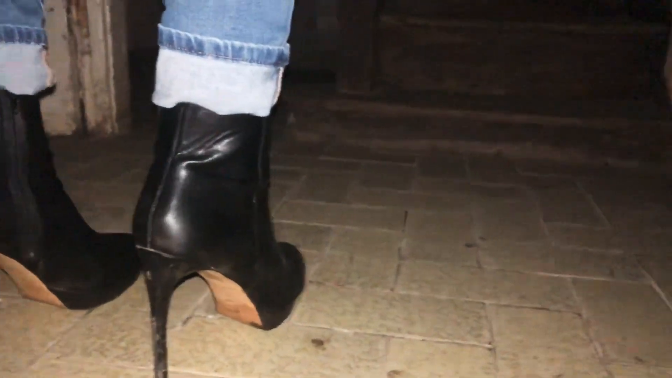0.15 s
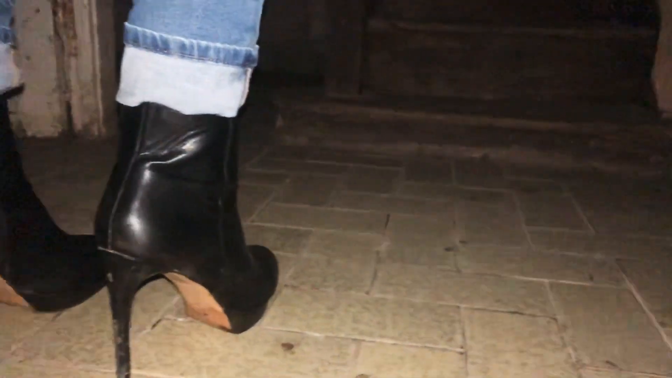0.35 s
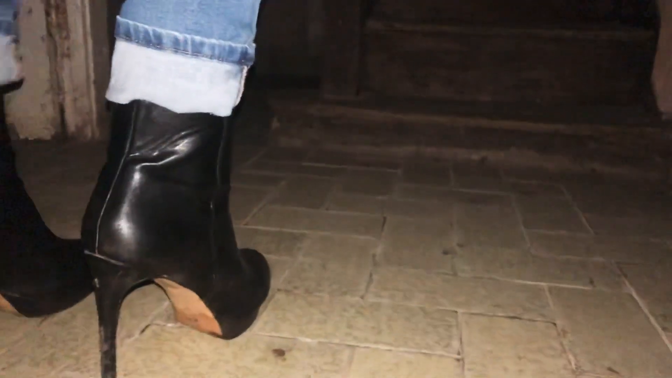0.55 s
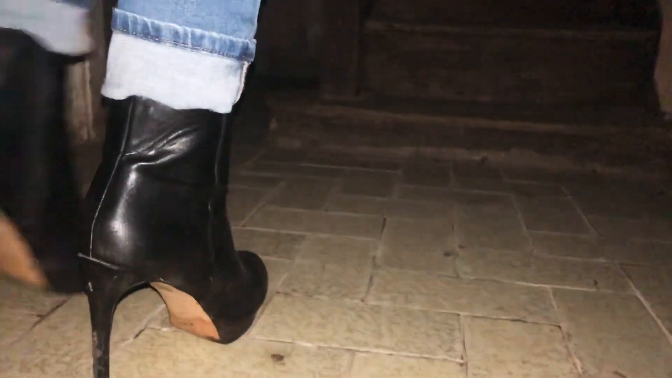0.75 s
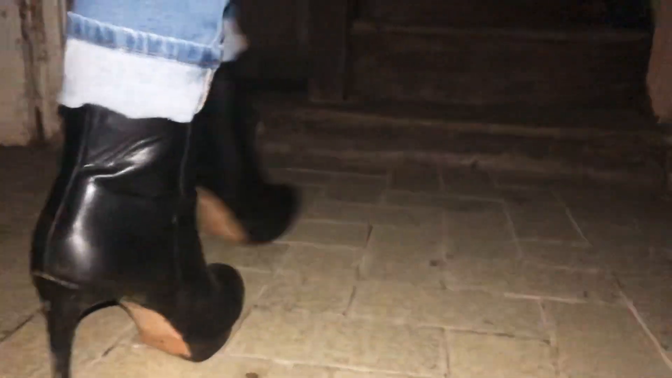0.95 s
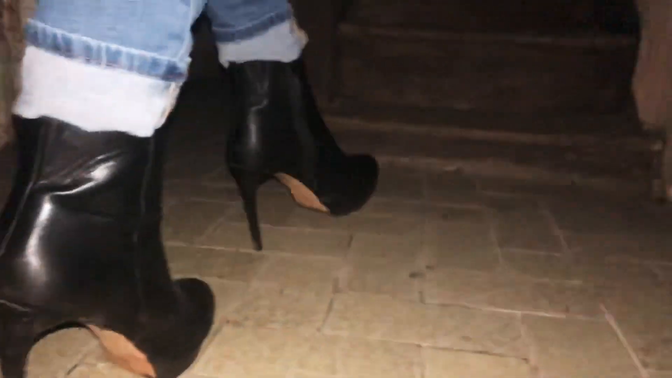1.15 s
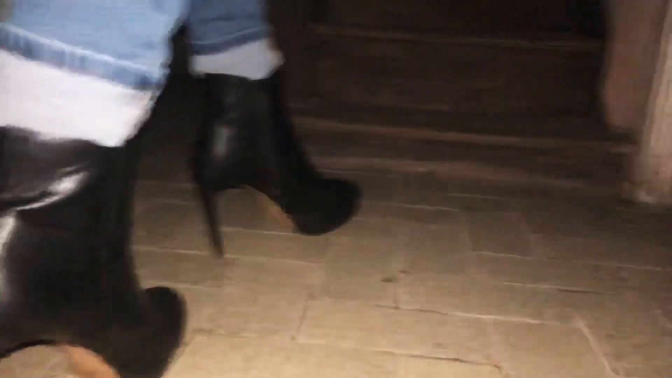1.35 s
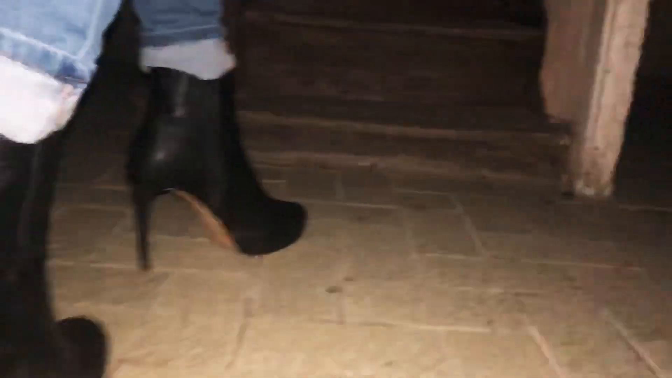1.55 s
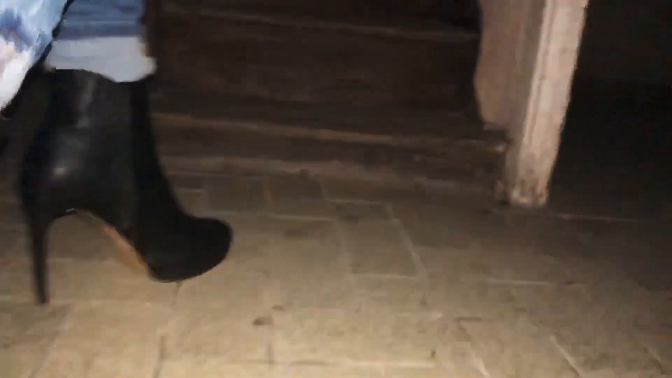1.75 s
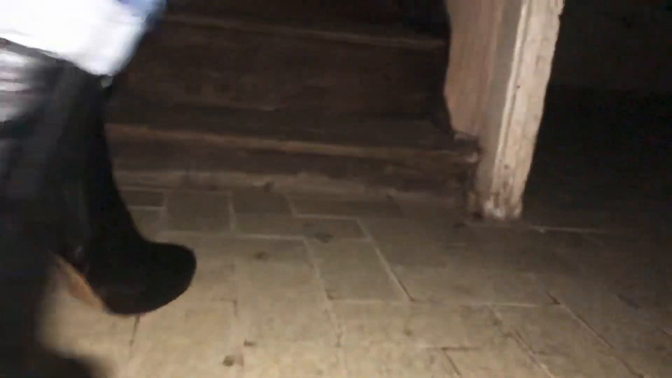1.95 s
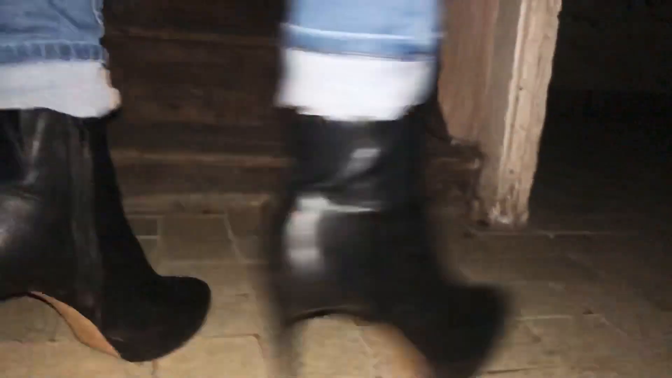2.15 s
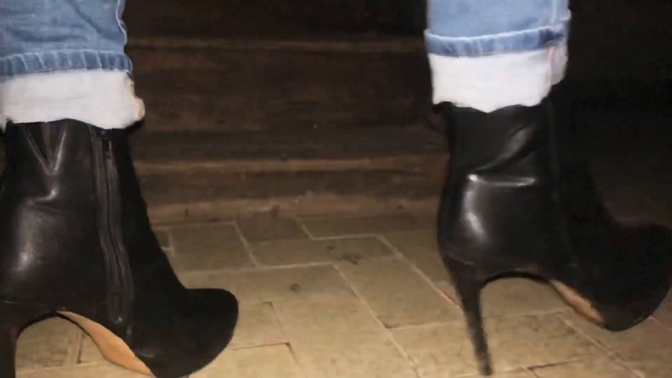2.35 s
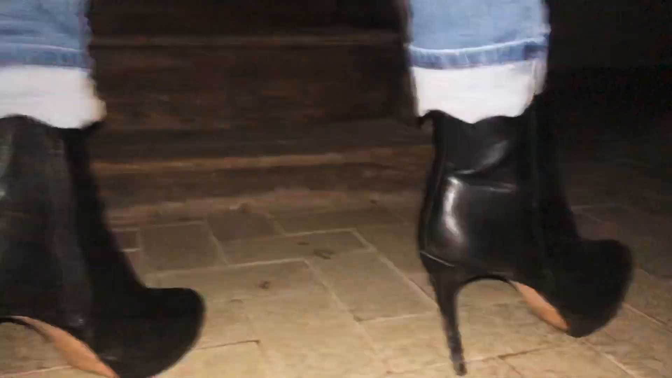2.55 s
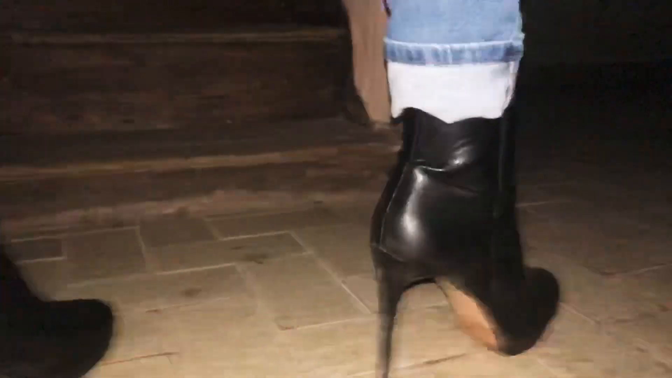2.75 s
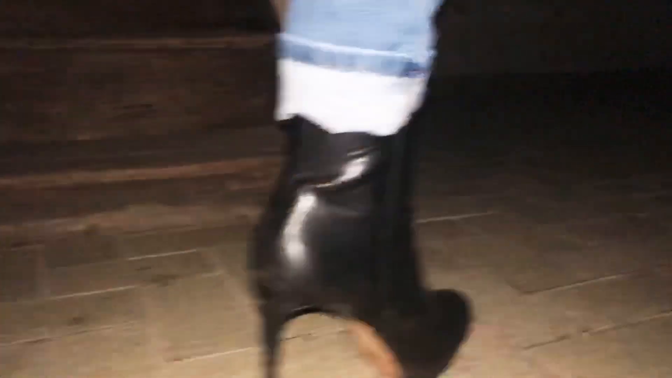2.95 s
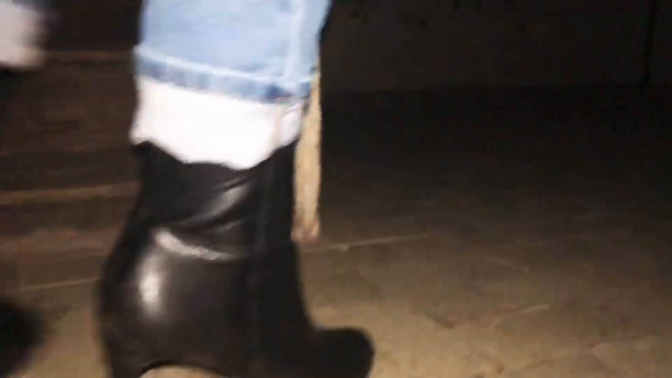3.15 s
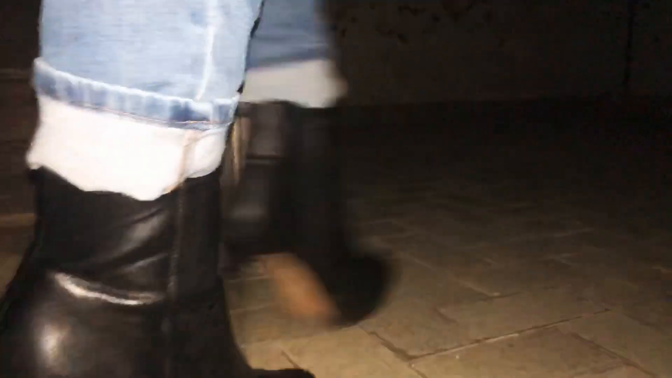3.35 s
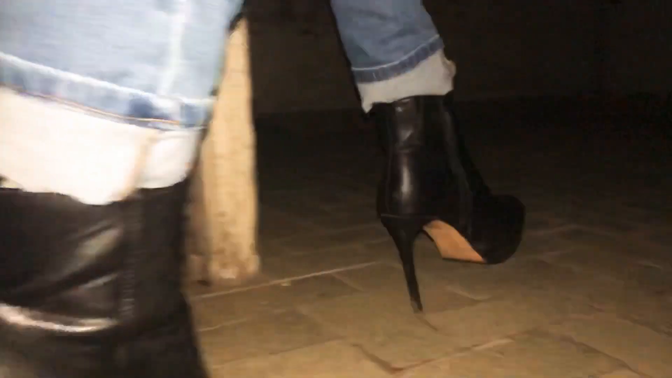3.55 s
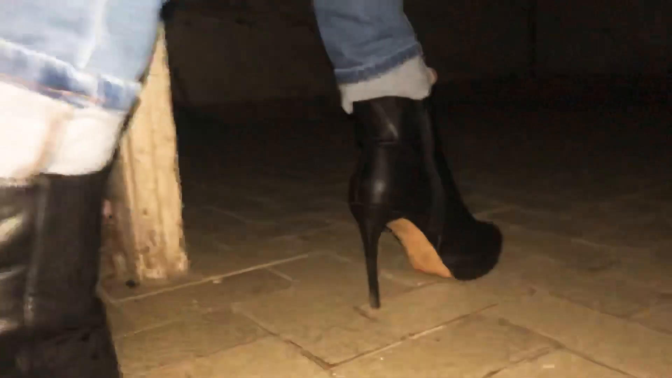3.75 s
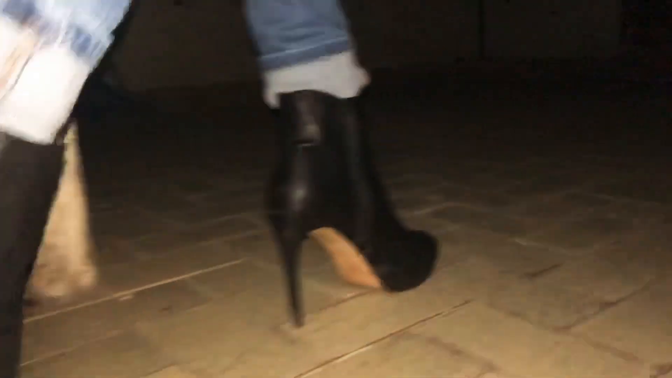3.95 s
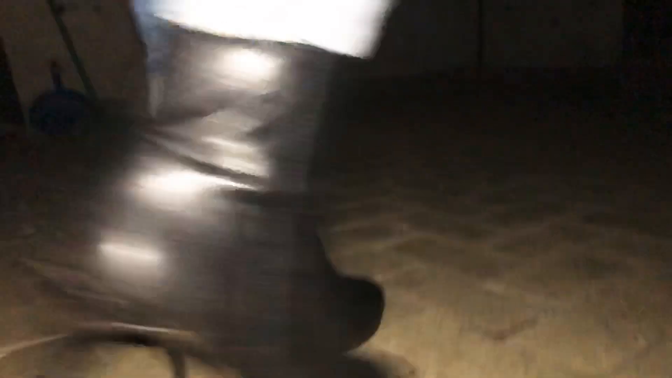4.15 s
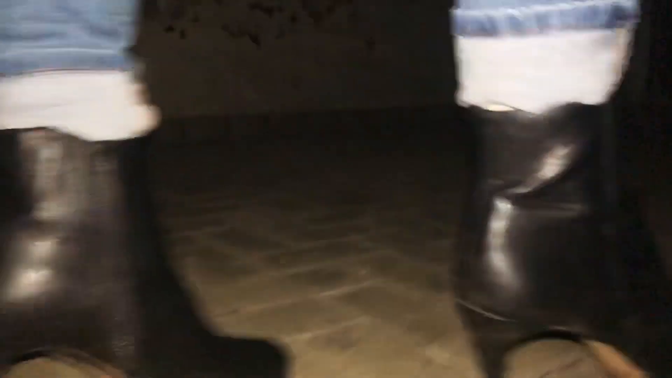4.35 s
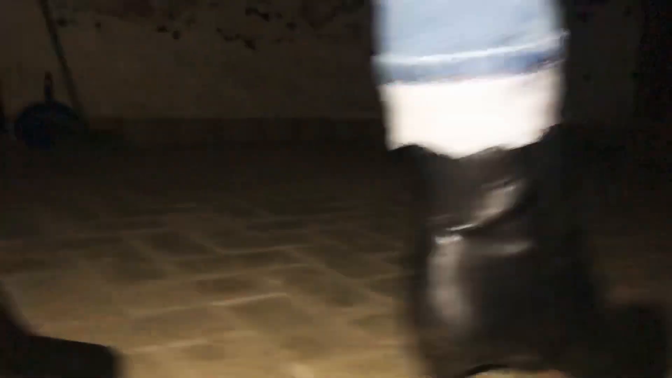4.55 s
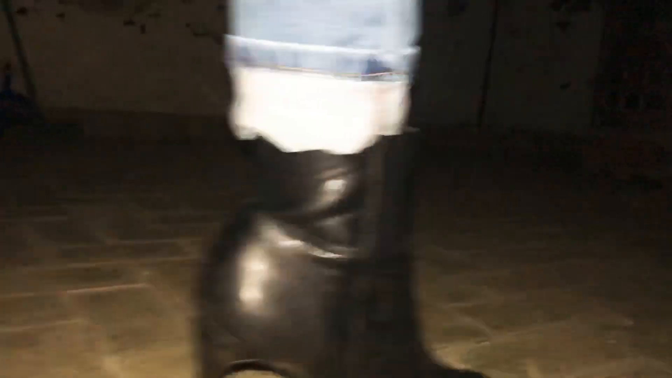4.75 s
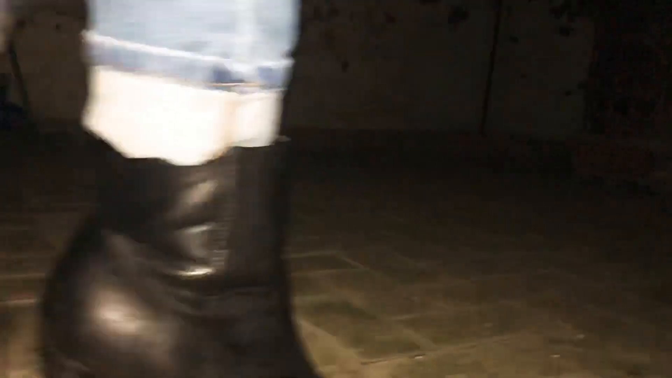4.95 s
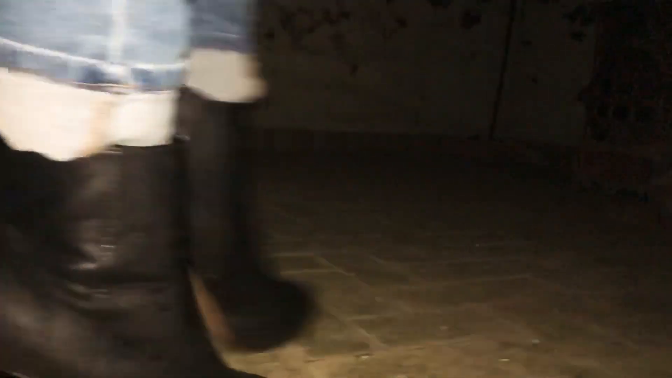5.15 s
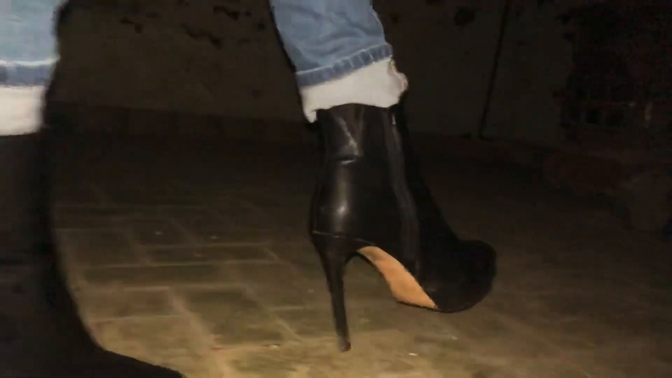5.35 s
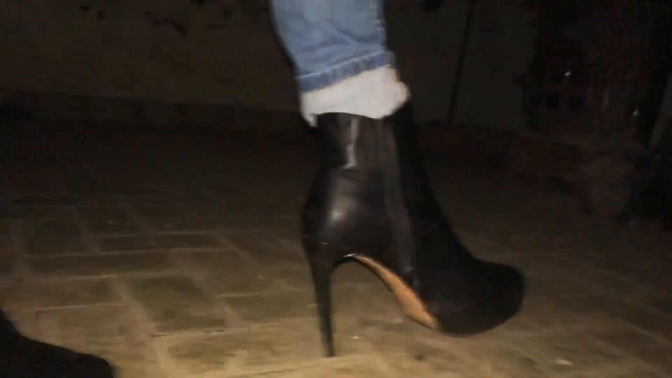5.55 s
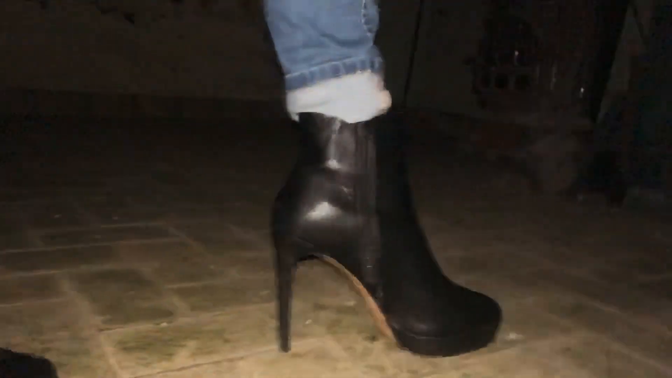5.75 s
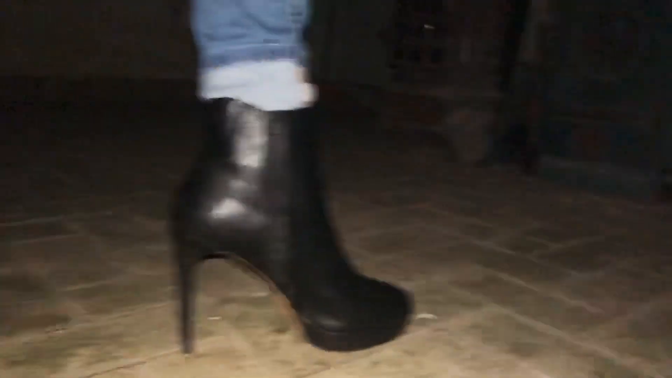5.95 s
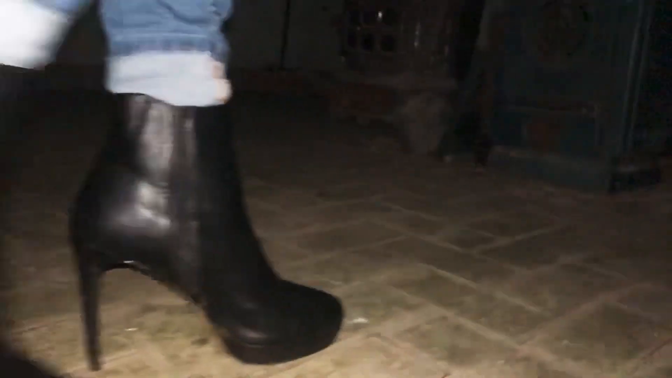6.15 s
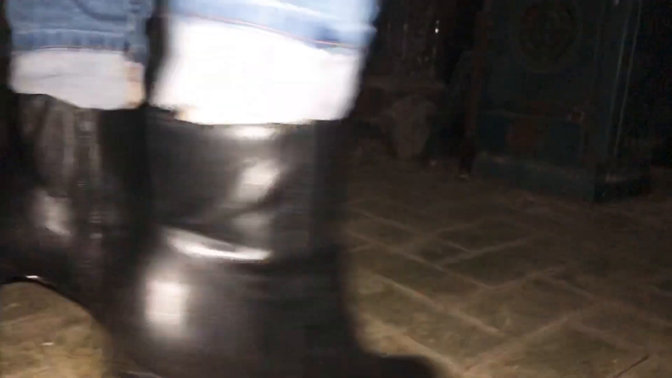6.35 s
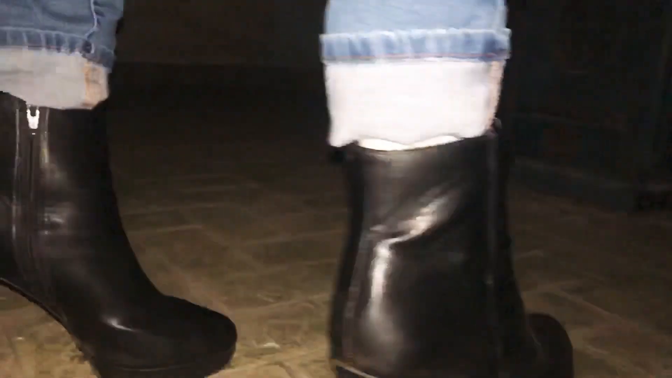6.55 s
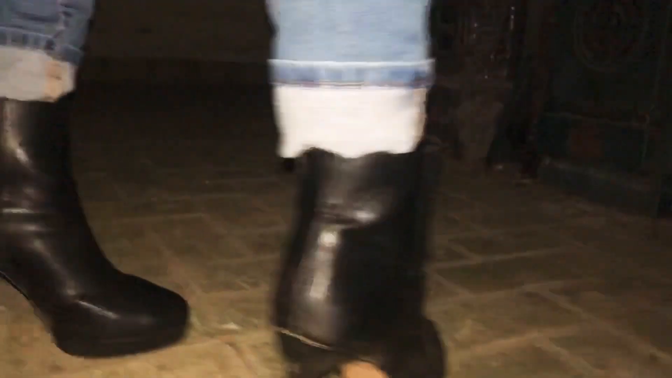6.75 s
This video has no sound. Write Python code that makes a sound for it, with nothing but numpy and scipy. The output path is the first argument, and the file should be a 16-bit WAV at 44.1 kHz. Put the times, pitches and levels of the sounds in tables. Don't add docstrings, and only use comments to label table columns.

```python
import sys
import numpy as np
from scipy import signal
from scipy.fft import rfft, irfft, next_fast_len
from scipy.io import wavfile
from scipy.ndimage import uniform_filter1d, map_coordinates

SR = 44100
rng = np.random.default_rng(int(sys.argv[2]) if len(sys.argv) > 2 else 0)


def how_loud(loudness_db):
    steps = np.asarray(loudness_db, float) / 20
    return 10 ** steps


def file_out(sig):
    cols = np.atleast_2d(sig).T
    lim = np.clip(cols, -1, 1)
    pcm = np.round(lim * 32767).astype(np.int16)
    wavfile.write(sys.argv[1], SR, pcm)


N = 298998

# frequency_hz, density_db (dB per Hz)
HISS_SPECTRUM = [(500, -18), (1000, 2), (2700, 0), (5800, -2), (9000, -5.5), (13000, -10), (15850, -11.5),
                 (16000, -57)]
MURMUR_SPECTRUM = [(94, -10), (160, 4), (268, -3), (478, -0.5), (1080, -9), (1800, -31), (2340, -22),
                   (3960, -120)]
HUM_SPECTRUM = [(44, -31), (75, -17), (108, -1.5), (126, -3.5), (146, -21), (200, -17.5), (260, -44),
                (440, -120)]
SHUDDER_SPECTRUM = [(15, -38), (30, -21), (45, -0.5), (70, -7), (90, -8.5), (130, -80)]
# time_s, level_db
RUSTLE = [(0, -74), (1.15, -73), (1.6, -69.5), (1.85, -62), (2.05, -71), (2.6, -70), (3.15, -64),
          (3.25, -71), (3.8, -70), (3.97, -62.5), (4.12, -64), (4.22, -69), (4.75, -66.5), (5.05, -70),
          (5.6, -70.5), (5.9, -65), (6.3, -72), (6.78, -71.5)]
# start_s, shudder_db, hum_db
JOLTS = [
    (3.12, -80, -55),
    (3.46, -81, -62),
    (3.61, -50, -54),
    (5.28, -74, -62),
]
MURMUR_DB, HUM_DB, SHUDDER_DB = -70.5, -68.5, -80
HUM_FADE_DB_PER_S, DRIFT_DB = -1.32, 2.5
MURMUR_FOLLOWS = 0.18
RUMBLE_DB, RUMBLE_RISE_S, RUMBLE_T60_S, RUMBLE_HUM_DB = -28.5, 0.017, 0.46, -4.5
JOLT_RISE_S, JOLT_T60_S = 0.04, 0.45
SPECK_DB, SPECK_SPREAD_DB, SPECK_TOP_DB = 12.5, 4.5, 17.5

# frequency_hz, t60_s
HALL_T60 = [(100, 0.99), (260, 0.24), (700, 0.42), (1800, 0.44), (4800, 0.36), (12000, 0.36)]
# frequency_hz, level_db
HALL_COLOUR = [(60, -7), (200, -8), (600, -3.5), (1150, -11.5), (3500, -9.5), (7000, -9), (15700, -15.5),
               (16000, -50)]
# frequency_hz, rise_s
HALL_RISE = [(300, 0.021), (900, 0.01), (1800, .004)]
# start_s, peak_db, pitch_hz, length_s
REBOUNDS = [(0.566, -55, 1100, 0.0035), (5.31, -62, 1400, .012), (0.569, -44.5, 620, 0.0032),
            (5.294, -49, 1250, 0.0024), (5.305, -52, 220, 0.01), (5.315, -57, 550, 0.005),
            (5.364, -57, 440, 0.0064), (5.377, -58, 250, 0.0071), (0.575, -51, 644, 0.0032),
            (0.58, -53, 895, 0.0045), (0.595, -54, 253, 0.0053), (0.617, -49.5, 170, 0.0091),
            (1.4, -41, 507, 0.005), (1.407, -38, 637, .006), (1.418, -43, 456, 0.0097),
            (1.5165, -40.5, 457, 0.0043), (1.531, -39, 640, 0.0046), (1.555, -39, 616, 0.0037),
            (2.6235, -35, 840, 0.0052), (2.63, -35, 554, 0.0048), (2.637, -37, 560, 0.0065),
            (2.652, -40, 564, 0.0054), (2.662, -42, 620, 0.013), (2.791, -43, 970, 0.0035),
            (2.822, -29, 397, 0.0055), (2.829, -36, 645, .006), (2.844, -42, 503, 0.0029),
            (3.623, -40, 850, 0.0045), (3.6312, -32.5, 610, 0.0057), (3.644, -45, 745, .004),
            (3.747, -44, 1060, 0.0055), (3.762, -41, 550, 0.0063), (3.777, -45, 560, 0.0066),
            (4.6227, -21.5, 875, 0.0048), (4.633, -36, 185, 0.014), (4.631, -32.5, 650, .005),
            (4.661, -36, 350, 0.011), (4.771, -35, 620, .005), (4.774, -36, 278, 0.0041),
            (4.786, -39, 450, 0.0043), (4.800, -33.5, 330, .007), (5.711, -39, 500, .006),
            (5.725, -42, 565, .005), (5.728, -49, 420, 0.004), (5.85, -43, 245, 0.0093),
            (6.712, -28.5, 855, 0.0043), (6.712, -37.5, 1440, .003), (6.722, -37, 784, 0.0064),
            (6.727, -38, 298, 0.0066), (6.741, -36, 650, .004), (6.756, -41, 660, 0.0074)]
REBOUND_RISE = 0.31

# start_s, length_s, level_db, pitch_hz
SINGS = [
    (5.874, 0.086, -63, 3230),
    (4.77, .06, -65, 3100),
    (5.876, 0.052, -61, 5540),
    (3.876, .035, -57, 5800),
    (3.878, .03, -61, 11500),
    (1.655, .04, -64, 5800),
]
SING_WIDTH = .06
# start_s, length_s, level_db, tilt_db_per_octave
SCRAPES = [(0.559, 0.009, -62, -4), (0.569, 0.021, -70, -1), (6.719, 0.053, -68.5, -15.5),
           (0.704, 0.08, -71.5, -2), (1.519, 0.01, -60.5, -1), (1.5583, 0.012, -45.5, 0),
           (1.635, 0.025, -56, 3.5), (1.569, 0.02, -58, 3), (1.902, 0.013, -56.5, -3.5),
           (2.623, 0.0064, -46, -6.5), (1.395, 0.061, -73, -12.5), (2.633, 0.064, -70, -14),
           (2.79, 0.0067, -60, -6), (2.814, 0.016, -56.5, 1), (3.621, 0.0057, -52, 1),
           (3.65, 0.0079, -60.5, 2.5), (3.862, 0.0057, -49.5, -10.5), (3.8647, 0.0057, -42, 3.5),
           (3.877, 0.053, -55, -2.5), (4.621, 0.0068, -43.5, -5.5), (4.636, 0.033, -66, -15.5),
           (4.714, 0.0037, -58, -13), (4.758, 0.017, -47.5, 0.5), (4.829, 0.11, -59.5, -2.5),
           (5.704, 0.044, -71, -13), (5.828, 0.0067, -61, -1), (5.857, 0.006, -55, 0),
           (5.8703, 0.0051, -48, 2), (5.866, 0.0022, -47, 2), (5.881, 0.0027, -53.5, 1.5),
           (5.874, 0.058, -63, -1), (6.095, 0.02, -64.5, -1), (6.714, 0.0052, -59, 3.5)]
# frequency_hz, density_db (dB per Hz)
GRIT_SPECTRUM = [(250, -40), (700, -5), (1500, 0), (2600, 3.5), (3600, 3), (6000, 4), (10000, 0),
                 (16000, -8.5)]
SCRAPE_TOP_HZ = 15950
BANDS_DB, LUMPS_DB = 2, 2.5

# start_s, peak_db, ring_hz, air_db
SNAPS = [(0.1184, -61.5, 4700, 8), (0.5603, -51, 2920, 1.5), (0.6189, -56, 5300, 0), (0.7232, -55, 4320, 0),
         (1.52, -55, 6700, 14), (1.753, -48.5, 5400, -4), (1.8964, -58, 4400, -6), (2.4806, -56, 3120, -4),
         (2.489, -54.5, 6440, -6), (2.7914, -42.5, 2870, 5), (3.6223, -45, 5900, 4), (3.6512, -56, 8200, 4),
         (3.8653, -28, 3900, 1.5), (4.016, -55, 6090, -13), (4.1326, -52, 3450, -10),
         (4.4266, -46.5, 5700, -5), (4.716, -46.5, 2970, 7), (4.751, -49, 3470, -28),
         (4.7678, -27.5, 3770, -11), (4.828, -24, 4300, -11), (4.8382, -29.5, 4000, -9),
         (4.8993, -41, 5500, 0), (4.935, -45, 3630, -9), (5.2192, -50.5, 4940, -5), (5.8283, -49, 8650, 0),
         (5.9099, -44, 6480, -14), (6.136, -42, 4300, -1.5), (6.716, -52, 6700, 9), (6.741, -52, 2890, -4),
         (6.762, -46.5, 7300, -9)]
# start_s, peak_db, ring_hz, body_db
CHIPS = [(0.0685, -56.5, 2970, -2), (0.7016, -57, 7400, 2), (1.393, -51.5, 3570, -8),
         (1.5544, -47.5, 2500, 12), (1.9092, -41.5, 6100, 7), (2.3384, -56, 3680, 2),
         (2.4326, -52, 2830, 5), (2.6249, -37.5, 3440, 6.5), (2.628, -41, 2620, 2), (2.8158, -43, 3540, 0),
         (2.821, -55, 5300, -3), (3.124, -54, 2810, 12.5), (3.5073, -49.5, 3800, 0), (3.748, -58, 4080, 7),
         (4.047, -48, 6160, -3), (4.0774, -45, 2730, -1), (4.3103, -53, 3490, 8), (4.6216, -32.5, 3500, -9),
         (4.6235, -35.5, 5440, -15), (4.8662, -41, 3430, -3), (5.294, -57, 3050, 9),
         (5.5579, -53.5, 7350, 11), (5.702, -48.5, 2400, 2), (5.745, -53, 3940, -4),
         (6.081, -46, 6650, 5.5), (6.711, -45, 3400, 1), (0.857, -59, 3900, -15), (6.1374, -45, 3460, 1.5),
         (5.893, -47, 5000, -17), (2.634, -52, 5800, -20), (5.93, -58, 9000, -20), (1.69, -50, 11000, -20),
         (4.85, -50, 4200, -20), (4.911, -50, 8500, -20)]
# first_s, last_s, first_db, last_db, ring_hz
CRUSHES = [(1.5596, 1.5634, -34, -33.5, 4640), (1.5807, 1.587, -37, -48, 4200),
           (1.6348, 1.641, -35.5, -32.5, 4140), (1.643, 1.651, -32.5, -38, 4200),
           (2.887, 2.894, -52, -47, 5530), (3.1035, 3.1134, -36, -59, 2710),
           (3.8632, 3.864, -46, -38, 5500), (4.3433, 4.352, -50.5, -54, 3050),
           (4.3592, 4.3616, -47.5, -54, 4680), (4.406, 4.4111, -52, -46, 3260),
           (5.855, 5.856, -54, -47, 5900), (5.869, 5.8727, -33.5, -33.5, 4360),
           (4.873, 4.874, -47, -47, 3000)]
# first_s, last_s, peak_db
ZIP_SWINGS = [
    (1.318, 1.481, -55),
    (2.677, 2.905, -50.5),
    (3.684, 3.775, -53.5),
    (5.58, 5.664, -56),
    (5.7416, 5.86, -57),
]
# frequency_hz, density_db (dB per Hz)
AIR_SPECTRUM = [(4000, -5), (8000, 3), (11000, 4.5), (14000, -2.5), (16800, -18)]
STAGE_S, SWING_S = .0032, .0435
SNAP_BODY_DB, CHIP_AIR_DB, CRUSH_AIR_DB, CRUSH_BODY_DB = -20.5, -8, -10.5, -10
CRUSH_SCATTER = 0.056
ZIP_HZ, ZIP_AIR_DB, ZIP_BODY_DB, ZIP_BOUNCE_S, ZIP_BOUNCE_DB = 5820, -21, -4.5, 0.0048, 1

# start_s, peak_db, middle_hz, thump_db, heel_ring_db
HEELS = [
    (0.5622, -51, 520, 4.5, -12),
    (1.393, -31.5, 558, -10, -14.5),
    (2.6228, -31, 430, -8.5, -31),
    (3.6238, -31, 515, -13.5, -7),
    (4.6209, -23, 295, -4, -26),
    (4.757, -24, 363, -9.5, -5),
    (6.7115, -28.5, 330, -5, -17),
]
# start_s, peak_db, middle_hz, thump_db, heel_ring_db
SOLES = [
    (1.5245, -37.5, 704, -10, -1.5),
    (2.8152, -26.5, 445, -6, -9.5),
    (3.747, -30, 429, -10, -15),
    (5.702, -23.5, 413, -6.5, -24),
    (5.8272, -34, 386, -5, -20),
]
# start_s, peak_db, middle_hz, thump_db, edge_db
TAPS = [(1.342, -59, 549, -5, -17), (1.909, -55.5, 460, -22, 3), (2.7905, -42, 400, -18, -20),
        (3.104, -51, 550, -26, -8), (3.168, -57, 474, -22, -5), (3.863, -38.5, 447, -19, -10),
        (4.047, -58, 525, -22, 4), (4.072, -55, 647, -31, -11), (4.307, -58.5, 503, -30, 0.5),
        (4.931, -54, 428, -16, 5), (5.295, -55.5, 300, 1, -16), (5.665, -55.5, 438, 1.5, -26),
        (0.618, -70, 300, 10, -22), (0.702, -66, 500, -11, -9), (0.75, -60.5, 520, -11, -3),
        (3.189, -58, 523, -21, -11), (4.718, -56, 597, -19, -3), (2.019, -63.5, 650, -11, 0),
        (2.191, -68, 650, -15, -1), (2.278, -65, 684, -24, 0), (2.339, -64, 680, -15, -12),
        (2.433, -61, 680, -17, -10), (5.335, -64, 250, 3.5, -25), (3.447, -63, 705, -22, -3)]
# frequency_hz, width_hz, level_db
TILE_MODES = [(185.7, 74, 5.5)]
HEEL_MODES = [(868, 180, -0.3), (1660, 73, -8)]
HEEL_EDGE_DB, SOLE_EDGE_DB, TAP_RING_DB = -17.5, -27.5, -7.5

# frequency_hz, level_db
MIC_RESPONSE = [(22, -21), (50, 0), (2200, -0.5), (2600, -0.5), (2800, -1), (3000, -1), (3250, 0),
                (3700, -0.5)]
MIC_TOP_HZ = 16750
# frequency_hz, level_db
CUPPED_COLOUR = [(2300, 0.8), (2600, -1.5), (2850, -9), (3050, -1), (3220, 1), (3450, -3), (3800, -0.5)]
# time_s, cupped_share
GRIP = [(0, 0.011), (5.2, 0.01), (5.45, 0.61), (6.05, 0.82), (6.3, 0.0088)]


def unit(x):
    return x / np.sqrt(np.mean(x ** 2) + 1e-20)


def along(points, hz):
    f, v = np.transpose(points)
    return np.interp(np.log(hz + 1), np.log(f + 1), v)


def filtered(x, response):
    m = next_fast_len(len(x) + 4096)
    return irfft(rfft(x, m) * response(np.fft.rfftfreq(m, 1 / SR)), m)[:len(x)]


def add(track, s, sound):
    at = round(s * SR)
    track[at:at + len(sound)] += sound


def curves(rows):
    s, *levels = np.transpose(rows)
    return [how_loud(np.interp(np.arange(N) / SR, s, db)) for db in levels]


def swells(rows, rise, t60):
    since = np.maximum(np.arange(N) / SR - np.array(rows)[:, :1], 0)
    decay = how_loud(np.array(rows)[:, 1:2] - 60 * since / t60)
    return np.sum(decay * np.minimum(since / rise, 1), axis=0)


def drift(rate):
    knots = rng.standard_normal(int(N * rate / SR) + 4)
    return how_loud(DRIFT_DB * map_coordinates(knots, [np.arange(N) * rate / SR]))


def modes(table, hz, luck):
    return sum(how_loud(db + u) * 1j * hz * w / (c * c - hz * hz + 1j * hz * w)
               for (c, w, db), u in zip(table, luck))


def spaced(first, last, gap):
    return np.linspace(0, 1, 1 + max(1, round((last - first) / gap)))


def rush(spectrum, patchy_db):
    z = signal.stft(rng.standard_normal(N), nperseg=512)[2]
    field = uniform_filter1d(rng.standard_normal(z.shape), size=6, axis=0)
    field = uniform_filter1d(field, size=10, axis=1)
    x = signal.istft(z * how_loud(patchy_db * unit(field)), nperseg=512)[1][:N]
    return unit(filtered(x, lambda hz: how_loud(along(spectrum, hz))))


def stillness():
    rumble = how_loud(RUMBLE_DB) * swells([row[:2] for row in HEELS + SOLES], RUMBLE_RISE_S, RUMBLE_T60_S)
    jolt = swells([(s, db) for s, db, _ in JOLTS], JOLT_RISE_S, JOLT_T60_S)
    boom = swells([(s, db) for s, _, db in JOLTS], JOLT_RISE_S, JOLT_T60_S)
    rustle = curves(RUSTLE)[0]
    murmur = how_loud(MURMUR_DB) * (rustle / how_loud(MURMUR_DB)) ** MURMUR_FOLLOWS + rumble
    hum = how_loud(HUM_DB + HUM_FADE_DB_PER_S * np.arange(N) / SR) * drift(8.6)
    hum = hum + how_loud(RUMBLE_HUM_DB) * rumble + boom
    sound = rustle * rush(HISS_SPECTRUM, patchy_db=.4)
    sound = sound + (how_loud(SHUDDER_DB) + jolt) * rush(SHUDDER_SPECTRUM, patchy_db=3.5)
    sound = sound + murmur * rush(MURMUR_SPECTRUM, patchy_db=1.9)
    return sound + hum * rush(HUM_SPECTRUM, patchy_db=2.5)


def specks():
    at, size = rng.uniform(0, 1, (2, 260))
    size_db = np.minimum(-SPECK_SPREAD_DB * np.log(1 - size), SPECK_TOP_DB)
    spikes = np.bincount((at * N).astype(int), how_loud(size_db), N)
    ticks = filtered(spikes, lambda hz: how_loud(along(GRIT_SPECTRUM, hz) - 3.5))
    return curves(RUSTLE)[0] * how_loud(SPECK_DB) * ticks


def hall(x):
    out, step = np.zeros(len(x) + SR), SR // 8
    for at in range(0, N, step):
        hz, t, z = signal.stft(rng.standard_normal(SR * 2 // 3), SR, nperseg=256)
        decay = how_loud(-60 * t / along(HALL_T60, hz)[:, None])
        rise = np.clip((t - .005) / along(HALL_RISE, hz)[:, None], 0, 1)
        tail = signal.istft(z * decay * rise, SR, nperseg=256)[1]
        tail = tail * np.clip((np.arange(len(tail)) / SR - .007) / 0.004, 0, 1)
        add(out, at / SR, signal.fftconvolve(x[at:at + step], tail / np.linalg.norm(tail)))
    return filtered(out[:len(x)], lambda hz: how_loud(along(HALL_COLOUR, hz)))


def rebounds():
    out, t = np.zeros(N + SR), np.arange(SR // 20) / SR
    for s, db, hz, length in REBOUNDS:
        u = t / (REBOUND_RISE * length)
        add(out, s - .0007, how_loud(db) * u * np.exp(1 - u) * np.sin(2 * np.pi * hz * t))
    return out


def sings():
    out, t = np.zeros(N + SR), np.arange(SR // 5) / SR
    for s, length, db, hz in SINGS:
        noise = rng.standard_normal(len(t))
        tone = unit(filtered(noise, lambda f: np.exp(-((f / hz - 1) / SING_WIDTH) ** 2)))
        add(out, s, how_loud(db) * np.minimum(t / 0.0021, 1) * np.exp(-(t / length) ** 2) * tone)
    return out


def scrapes():
    out = np.zeros(N + SR)
    t = np.arange(round(.2 * SR)) / SR - .01
    for s, length, db, tilt_db in SCRAPES:
        stroke = np.clip(t / 0.00034, 0, 1) * np.exp(-np.clip(t / length, 0, 9) ** 3)
        knots = rng.standard_normal(400)
        lumps = how_loud(LUMPS_DB * map_coordinates(knots, [np.arange(len(t)) * 700 / SR]))
        bands = BANDS_DB * rng.standard_normal(17)
        grains = unit(lumps * rng.standard_normal(len(t)))

        def colour(hz):
            tilt = tilt_db * np.log2(np.maximum(hz, 700) / 4000)
            uneven = np.interp(hz / 1000, np.arange(17), bands)
            return how_loud(along(GRIT_SPECTRUM, hz) + tilt + uneven) * (hz < SCRAPE_TOP_HZ)

        add(out, s - .01, how_loud(db + 3) * filtered(stroke * grains, colour))
    return out


def crush_stages():
    rows = []
    for a, b, a_db, b_db, hz in CRUSHES:
        for u in spaced(a, b, STAGE_S):
            ring_hz = hz * (1 + CRUSH_SCATTER * rng.standard_normal())
            rows.append((a + u * (b - a), a_db + u * (b_db - a_db), ring_hz, CRUSH_AIR_DB, CRUSH_BODY_DB))
    return rows


def zip_ticks():
    return [(a + u * (b - a) + k * ZIP_BOUNCE_S, db + k * ZIP_BOUNCE_DB, ZIP_HZ, ZIP_AIR_DB, ZIP_BODY_DB)
            for a, b, db in ZIP_SWINGS for u in spaced(a, b, SWING_S) for k in range(2)]


def breaks():
    snaps = [(*row, SNAP_BODY_DB) for row in SNAPS]
    chips = [(s, db, hz, CHIP_AIR_DB, body_db) for s, db, hz, body_db in CHIPS]
    return snaps + chips + crush_stages() + zip_ticks()


def cracks():
    out, t = np.zeros(N + SR), np.arange(300) / SR
    rise = 1 - np.exp(-t / .0001)
    rows = breaks()
    chance = rng.standard_normal((len(rows), 2, len(t)))
    for (s, db, hz, air_db, body_db), (noise, shake) in zip(rows, chance):
        ring = np.sin(2 * np.pi * hz * t + .13 * np.cumsum(shake)) * how_loud(-60 * t / .0028)
        ring = ring + 0.72 * np.sin(2 * np.pi * 1.455 * hz * t) * how_loud(-60 * t / 0.0011)
        air = unit(filtered(noise, lambda f: how_loud(along(AIR_SPECTRUM, f))))
        air = air * how_loud(air_db - 3 - 60 * t / .003)
        body = np.sin(2 * np.pi * 1800 * t) * how_loud(body_db - 6.0 - 60 * t / 0.0037)
        add(out, s - .0001, how_loud(db + 7.0) * rise * (ring + air + body))
    return filtered(out, lambda f: (1j * f / (500 + 1j * f)) ** 2)


def blows():
    heels = [(*row, HEEL_EDGE_DB) for row in HEELS]
    soles = [(*row, SOLE_EDGE_DB) for row in SOLES]
    taps = [(s, db, hz, thump_db, TAP_RING_DB, edge_db) for s, db, hz, thump_db, edge_db in TAPS]
    return heels + soles + taps


def knocks():
    out, hz = np.zeros(N + SR), np.fft.rfftfreq(4096, 1 / SR)
    rows = blows()
    chance = rng.uniform(-1.07, 1, (len(rows), 6))
    lag = 2 * 0.0891 * (np.sqrt(hz) - hz / (2 * np.sqrt(2500)))
    bending = np.exp(-2j * np.pi * (lag + 0.27))
    soft = 1 / (1 + 1j * hz / 1600) ** 3
    early = np.exp(2j * np.pi * 0.00005 * hz)
    for (s, db, middle_hz, thump_db, heel_db, edge_db), luck in zip(rows, chance):
        colour = [(35, -45), (70, thump_db - 11), (200, thump_db + 0.5),
                  (middle_hz, 0), (1.367 * middle_hz, -4), (1000, heel_db - 10),
                  (1400, edge_db - 2.5), (2100, edge_db - 13.0), (3500, edge_db - 32.0), (6000, -120)]
        tile = how_loud(along(colour, hz)) * (1 + modes(TILE_MODES, hz, luck)) * bending
        heel = how_loud(heel_db + 3.0) * modes(HEEL_MODES, hz, luck[1:]) * soft * early
        replies = 1
        for late, u in zip((.006, .0095), luck[4:]):
            replies = replies + how_loud(-20) * np.exp(-2j * np.pi * hz * (late + 0.00137 * u))
        wave = irfft((tile + heel) * replies * np.exp(-2j * np.pi * .01 * hz))
        add(out, s - .009, how_loud(db + 38.5) * wave)
    return out


def scene():
    steps = knocks() + cracks() + scrapes()
    walk = steps + hall(steps) + rebounds() + sings()
    return (walk[:N] + specks() + stillness())[None]


def held(x):
    share = np.clip(np.interp(np.arange(N) / SR, *np.transpose(GRIP)), 0, 1)
    return (1 - share) * x + share * filtered(x, lambda hz: how_loud(along(CUPPED_COLOUR, hz)))


def band_limit(x):
    return signal.sosfilt(signal.butter(12, 16850, fs=SR, output="sos"), x)


def record(dry):
    mix = filtered(held(dry[0]), lambda hz: how_loud(along(MIC_RESPONSE, hz)) * (hz < MIC_TOP_HZ))
    return band_limit(mix[None])


dry = scene()
out = record(dry)
file_out(out)
```